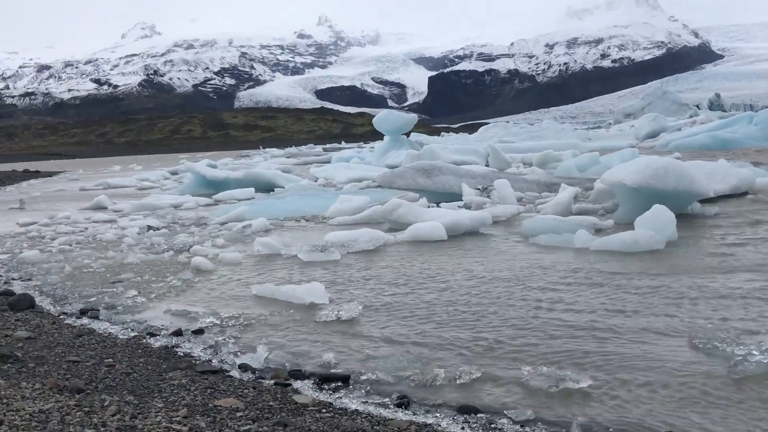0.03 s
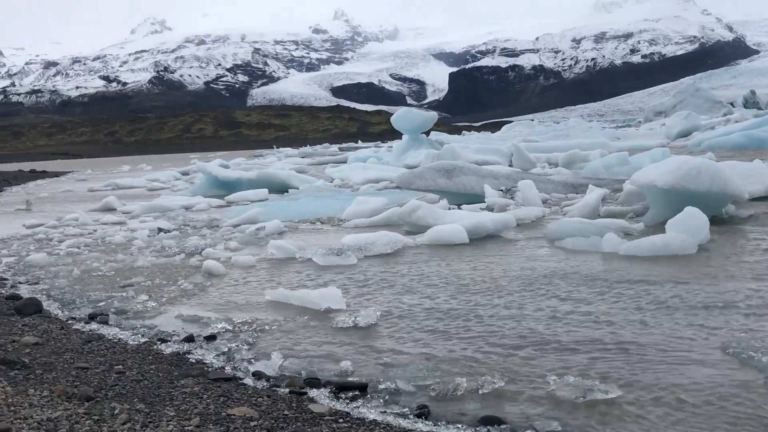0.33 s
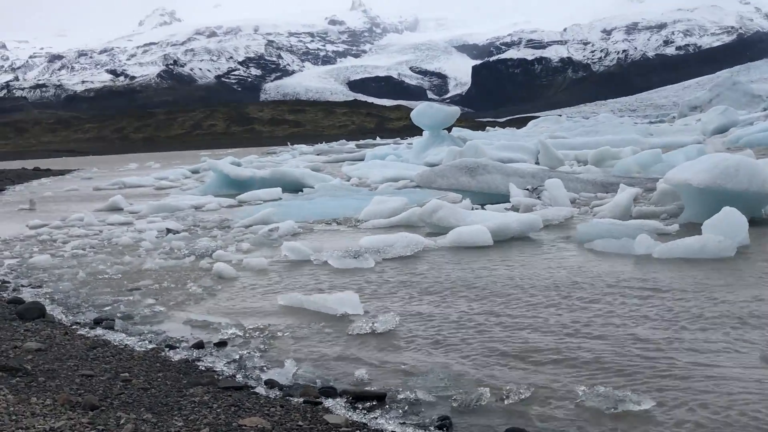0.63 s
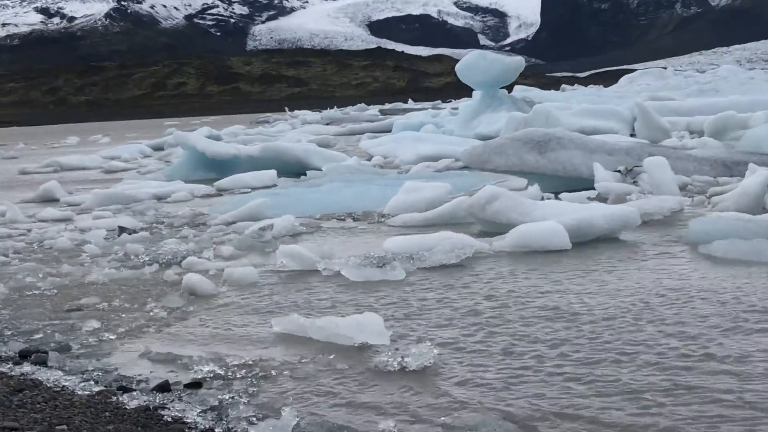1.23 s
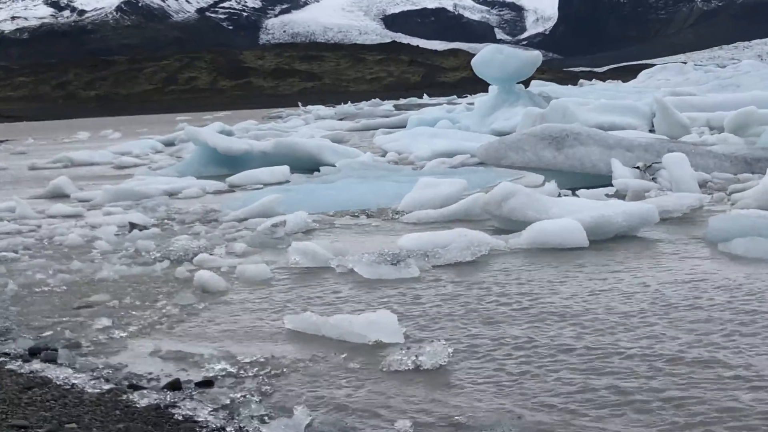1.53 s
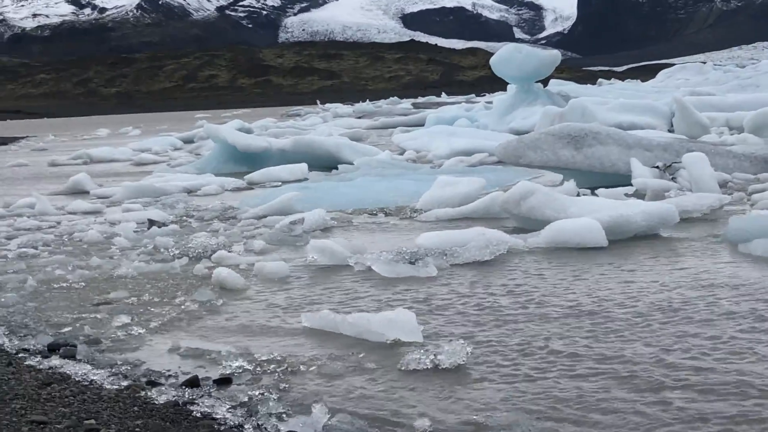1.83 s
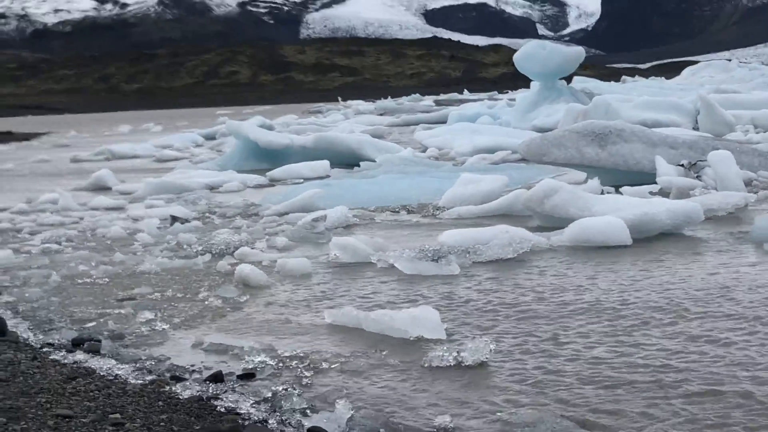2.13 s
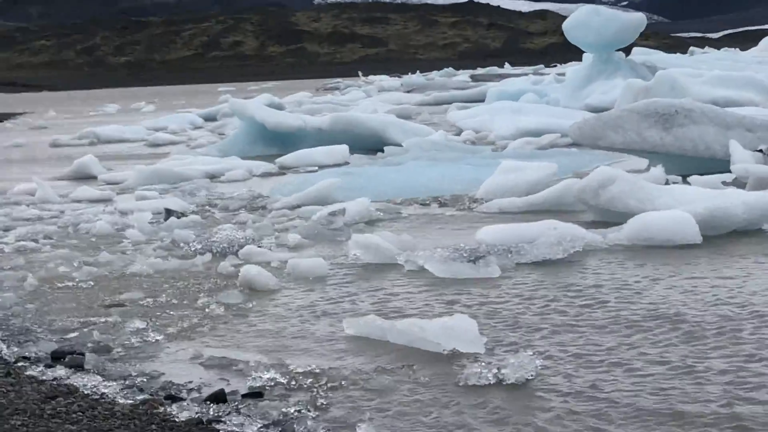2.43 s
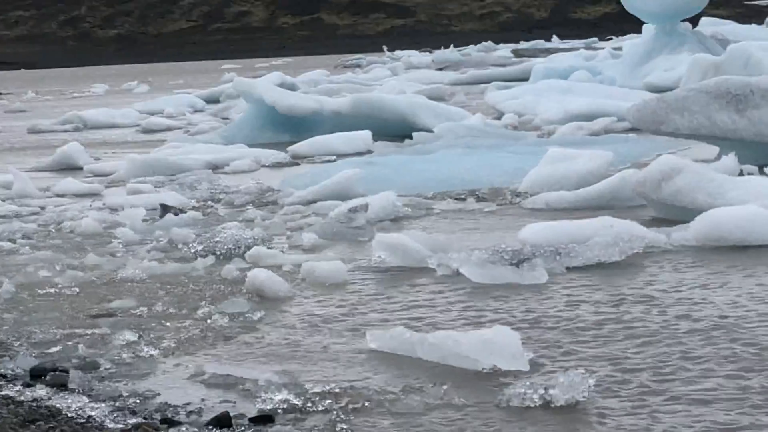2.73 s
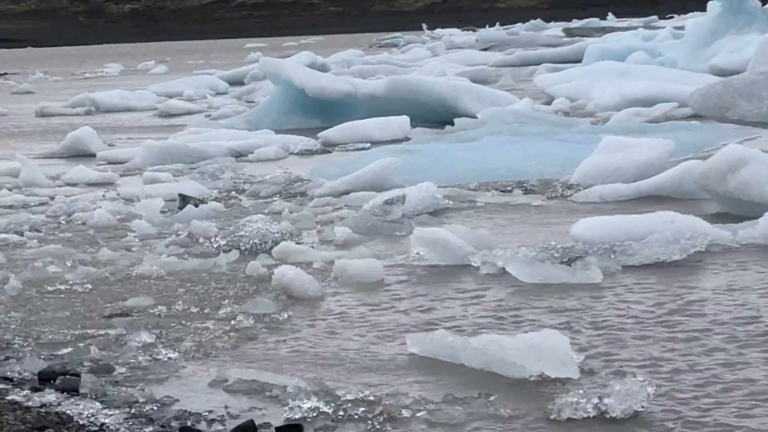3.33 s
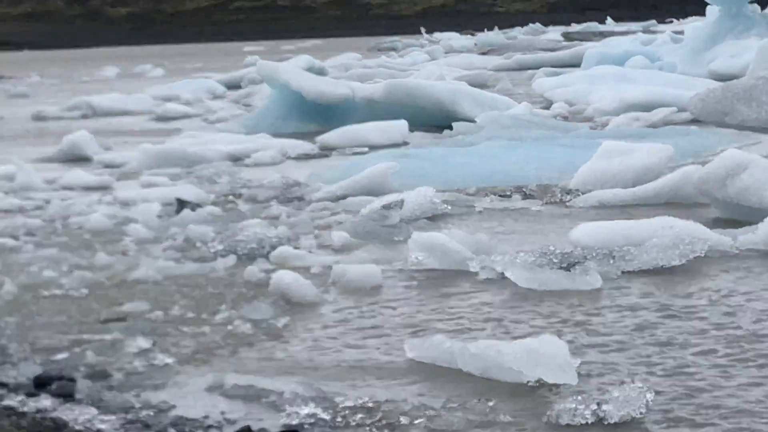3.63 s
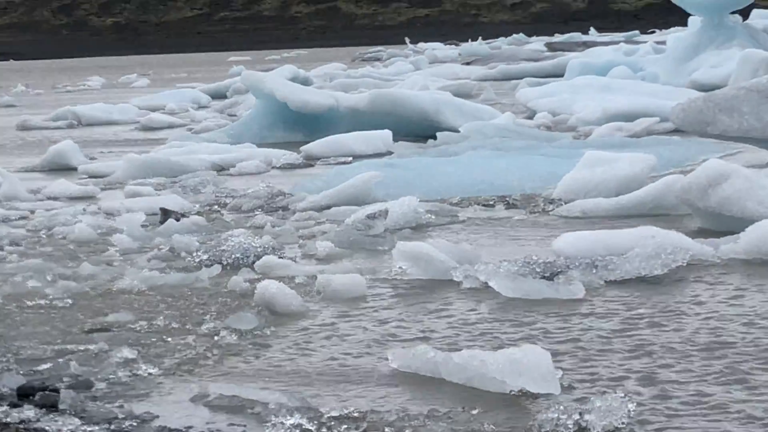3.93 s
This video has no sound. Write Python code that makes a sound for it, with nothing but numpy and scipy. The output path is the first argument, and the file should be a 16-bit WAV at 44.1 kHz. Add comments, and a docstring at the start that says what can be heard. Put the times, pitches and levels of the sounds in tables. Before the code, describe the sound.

Gusty wind buffets the microphone from the start, in short, rough bursts over a low rumble. A hard gust lands at about 1 second, and another sharp blow near 1.8. The bursts ease briefly after 2 seconds, when a few wavelets fizz very faintly on the gravel shore. Deep thumps then come louder and more often, with more buffeting until 4 seconds. Rippling lagoon water hisses softly behind throughout.

```python
"""Gusty wind on a bare microphone, standing on the shore of an icy lagoon.
From the start, eddies break on the port in short, rough bursts that brighten as they grow stronger,
over a low rumble that swells slightly with the gusts. A hard gust lands near one second. Around two,
a few wavelets fizz faintly on the gravel, and from there deep thumps come louder and more often.
Rippling water hisses behind throughout; the recorder's limiter holds down the hardest blows."""
import sys
import numpy as np
from scipy import signal
from scipy.fft import rfft, irfft, next_fast_len
from scipy.io import wavfile
from scipy.ndimage import uniform_filter1d, minimum_filter1d, map_coordinates

SR = 44100
rng = np.random.default_rng(int(sys.argv[2]) if len(sys.argv) > 2 else 0)


def generate_wav(sig):
    """Save sig (samples, or channels by samples) to the path in sys.argv[1] as 16-bit PCM at SR."""
    pcm = np.round(np.clip(np.atleast_2d(sig).T, -1, 1) * 32767).astype(np.int16)
    wavfile.write(sys.argv[1], SR, pcm)


N = 176400

# air flow between the eddies: time_s, force_db
AIR_FLOW = [(0, -27), (.25, -23.5), (.4, -54), (.49, -50), (.55, -29), (.7, -52), (.8, -33.5), (1.0, -21.5),
            (1.3, -51.5), (1.66, -34.5), (1.76, -31.5), (2.0, -33.5), (2.25, -33), (2.43, -41.5),
            (2.7, -41), (2.85, -39), (3.0, -34.5), (3.25, -30), (3.4, -34.5), (3.5, -30.5), (3.77, -37.5),
            (4.0, -30.5)]
# eddies that hit the microphone port: centre_s, length_s, force_db
PORT_EDDIES = [(0.005, 0.042, -10.5), (0.03, 0.015, -32), (0.036, 0.028, -14.5), (0.085, 0.0049, -7),
               (0.158, 0.025, -20.5), (0.204, 0.017, -10.5), (.236, 0.012, -11), (0.288, 0.015, -9),
               (0.299, 0.039, -12.5), (0.342, 0.011, -12.5), (.364, 0.017, -12), (0.389, 0.0078, -13),
               (0.43, 0.017, -17.5), (0.454, .006, -27), (.583, 0.01, -16), (0.63, 0.0077, -15),
               (0.674, 0.01, -13.5), (0.732, 0.012, -15.5), (0.759, 0.021, -17.5), (0.787, 0.033, -24),
               (.833, 0.0099, -9), (0.937, 0.016, -5), (0.963, 0.029, -9), (1.002, 0.021, -9),
               (1.036, 0.017, -14), (1.071, 0.027, -15), (1.114, 0.0053, -14.5), (1.152, 0.013, -17),
               (1.167, 0.0053, -9), (1.206, 0.059, -13.5), (1.25, 0.032, -20.5), (1.282, 0.016, -19),
               (1.333, .007, -15), (1.35, 0.043, -23), (1.38, 0.009, -16), (1.411, 0.0068, -13),
               (1.476, 0.019, -21.5), (1.539, 0.013, -26), (1.564, 0.0059, -6.5), (1.619, 0.015, -16),
               (1.716, 0.022, -18), (1.788, 0.0086, -21), (1.814, 0.013, -14), (1.835, 0.01, -6.5),
               (1.845, 0.011, -4), (1.9, 0.0071, -22.5), (2.014, 0.0069, -17), (2.046, 0.013, -18),
               (2.075, 0.016, -14), (2.33, 0.089, -26), (2.479, 0.0077, -18.5), (2.535, 0.044, -26),
               (2.577, 0.012, -12.5), (2.608, 0.027, -23), (2.67, .008, -17), (2.682, 0.0059, -11.5),
               (2.697, 0.022, -17.5), (2.741, 0.0052, -4), (2.775, 0.022, -9), (2.889, .014, -17),
               (2.949, 0.037, -22), (2.992, 0.028, -13.5), (3.067, 0.017, -13), (3.101, 0.017, -23.5),
               (3.161, 0.0066, -15.5), (3.184, 0.015, -11.5), (3.2, .04, -24.5), (3.289, 0.0049, -14),
               (3.329, 0.0081, -10.5), (3.355, 0.016, -14), (3.369, 0.0073, -5), (3.433, 0.023, -17),
               (3.472, 0.0042, -12), (3.51, 0.0076, -18.5), (3.543, 0.01, -28), (3.598, 0.0083, -15),
               (3.625, 0.0058, -27), (3.666, 0.019, -21), (3.707, .011, -14), (3.727, 0.0069, -13),
               (3.817, 0.046, -26.5), (3.891, 0.0094, -14), (3.915, 0.0036, -10), (3.941, 0.012, -10)]
# spectrum of the buffeting at the reference force: frequency_hz, density_db
BUFFET_SPECTRUM = [(30, -23.5), (70, -4.5), (130, 0.5), (220, -2), (350, -4), (600, -9), (1000, -18.5),
                   (1500, -29.5), (2100, -43.5), (3200, -60.5), (5000, -71), (9000, -79.5), (16000, -100)]
# level gained per decibel of force, so stronger flow is brighter: frequency_hz, growth_db_per_db
BUFFET_GROWTH = [(100, 0.88), (220, 0.82), (500, 0.7), (1000, 1.26), (2000, 1.46), (4000, 2.12),
                 (8000, 1.03)]
# spectrum of the large, slow swirls: frequency_hz, density_db
RUMBLE_SPECTRUM = [(12, -44.5), (25, -22.5), (32, -32.5), (42, -10), (55, -7), (80, 0), (120, -8.5),
                   (180, -8), (300, -25), (700, -57), (2000, -100)]
# pressure thumps of passing vortices: centre_s, level_db, pitch_hz
VORTEX_THUMPS = [(0.206, -19, 151), (0.914, -12, 124), (1.574, -10, 122), (1.855, -13, 111),
                 (2.19, -7.5, 82), (2.59, -6, 147), (2.671, -6.5, 202), (2.707, -9, 99), (2.801, -10.5, 95),
                 (3.191, -9, 105), (3.339, -4, 97.5), (3.895, -12, 124)]
# steep gust fronts that slap the port: centre_s, level_db
GUST_FRONTS = [(.085, -38.5), (.202, -35), (0.235, -39), (0.312, -32), (0.343, -35), (.678, -47.5),
               (0.747, -39), (.936, -33), (.959, -28.5), (0.999, -34), (1.564, -31), (1.845, -27),
               (2.582, -39.5), (2.683, -29.5), (2.741, -36.5), (3.068, -37), (3.181, -36), (3.326, -27),
               (3.371, -32), (3.936, -40)]
# spectrum of their cracks: frequency_hz, density_db
CRACK_SPECTRUM = [(500, -22.5), (1200, -1.5), (2200, 0.5), (3500, -6.5), (5000, -21), (7000, -30),
                  (10000, -42), (16000, -57.5)]
# spectrum of the rippling water: frequency_hz, density_db
RIPPLE_SPECTRUM = [(100, -2), (700, 1), (1500, -2.5), (2500, -9), (4000, -12.5), (5500, -16.5),
                   (6600, -15.5), (7500, -20), (9000, -22.5), (10700, -23), (12500, -28), (15800, -32.5)]
# swell of the ripples: time_s, gain_db
RIPPLE_SWELL = [(0, 2), (.3, 0.5), (.5, -1.5), (.9, 0.5), (1.2, -3), (1.6, 0.5), (1.9, 1.5), (2.2, 1),
                (2.31, -3.5), (2.48, 1), (2.75, -0.5), (3.3, .5), (3.8, -0.5), (4, 0)]
# wavelets running up the gravel: centre_s, length_s, level_db
SHORE_WAVELETS = [(1.902, .3, -72), (2.16, .07, -64), (2.24, .05, -66), (2.49, .15, -67.5)]
# spectrum of their fizz: frequency_hz, density_db
FIZZ_SPECTRUM = [(1000, -20), (3000, -3.5), (5600, -4), (6700, 1), (7800, -8), (9600, -7), (10400, 1),
                 (11200, -0.5), (12200, -11), (15800, -15)]


def buffeting(force_db, flutter_db=2.5, crackle_db=6.5, strong_db=12, linger_cycles=0.38, level_db=-21):
    """Turbulence right at the port: each octave grows with the force at its own rate; low ones linger."""
    unrest = 1 - 0.55 * np.clip(force_db / strong_db, 0, 1)  # a strong eddy flutters less than light air
    whirls_db = flutter_db * wobble(100) + crackle_db * wobble(330)  # small whirls and the finest ones
    push_db = force_db + unrest * whirls_db
    air, out = noise(BUFFET_SPECTRUM), np.zeros(N)
    centres_hz = np.geomspace(100, 12800, 8)
    for hz, weights in zip(centres_hz, np.eye(len(centres_hz))):
        octave = filtered(air, lambda f: along(np.column_stack([centres_hz, weights]), f))
        push = amp(along(BUFFET_GROWTH, hz) * push_db)
        decay = np.exp(-hz / (linger_cycles * SR))  # a whirl outlasts its push by part of a cycle
        out += octave * signal.lfilter([1 - decay], [1, -decay], push)
    return amp(level_db) * out


def wind_force(reference_db=-21.5):
    """Force on the port in dB over the reference: the flow plus a bell-shaped swell for each eddy."""
    t = np.arange(N) / SR
    power = amp(curve(AIR_FLOW)) ** 2
    for centre_s, length_s, force_db in PORT_EDDIES:
        near = np.abs(t - centre_s) < 2 * length_s
        power[near] += amp(force_db) ** 2 * np.exp(-(2 * (t[near] - centre_s) / length_s) ** 2)
    return 10 * np.log10(power) - reference_db


def rumble(force_db, level_db=-20.5, growth=0.13, swing_db=1.0):
    """Large swirls keep the diaphragm heaving even between eddies."""
    return noise(RUMBLE_SPECTRUM) * amp(level_db + growth * force_db + swing_db * wobble(14))


def thumps(half_width_cycles=0.96):
    """A vortex passing the microphone swings the pressure for two or three slow cycles."""
    t, out = np.arange(N) / SR, np.zeros(N)
    for centre_s, level_db, pitch_hz in VORTEX_THUMPS:
        cycles = (t - centre_s) * pitch_hz
        envelope = amp(level_db) * np.exp(-(cycles / half_width_cycles) ** 2)
        out += envelope * np.sin(2 * np.pi * (cycles + rng.random()))
    return out


def cracks(half_width_s=0.0015):
    """A few milliseconds of bright, tearing air as each steep front slaps the port."""
    t = np.arange(N) / SR
    slaps = sum(amp(level_db) * np.exp(-((t - centre_s) / half_width_s) ** 2)
                for centre_s, level_db in GUST_FRONTS)
    return noise(CRACK_SPECTRUM) * slaps


def water(ripple_db=-52, swing_db=0.84):
    """Behind the wind, ripples wash faintly among the ice and a few wavelets fizz on the shore."""
    t = np.arange(N) / SR
    ripples = noise(RIPPLE_SPECTRUM) * amp(ripple_db + curve(RIPPLE_SWELL) + swing_db * wobble(35))
    lapping = sum(amp(level_db) * np.exp(-2 * ((t - centre_s) / length_s) ** 2)
                  for centre_s, length_s, level_db in SHORE_WAVELETS)
    return ripples + noise(FIZZ_SPECTRUM) * lapping


def amp(db):
    """Decibels to gain."""
    return 10 ** (np.asarray(db) / 20)


def along(points, hz):
    """Rows of frequency_hz, value, read at hz on a log axis."""
    frequencies_hz, values = np.transpose(points)
    return np.interp(np.log(hz + 1), np.log(frequencies_hz + 1), values)


def curve(rows):
    """Rows of time_s, value, as one value per sample."""
    return np.interp(np.arange(N) / SR, *np.transpose(rows))


def wobble(knots_per_s):
    """A smooth random curve."""
    return map_coordinates(rng.standard_normal(N // 16), [np.arange(N) * knots_per_s / SR], mode="wrap")


def filtered(x, response):
    """x through a filter whose gain is response(hz)."""
    size = next_fast_len(N + SR // 4)
    return irfft(rfft(x, size) * response(np.fft.rfftfreq(size, 1 / SR)), size)[..., :N]


def noise(spectrum):
    """Coloured noise of rms 1."""
    coloured = filtered(rng.standard_normal(N), lambda hz: amp(along(spectrum, hz)))
    return coloured / np.sqrt(np.mean(coloured ** 2) + 1e-20)


def scene():
    """One bare microphone on the shore: wind right on it, water behind."""
    force_db = wind_force()
    return (buffeting(force_db) + rumble(force_db) + thumps() + water() + cracks())[None]


def record(dry, low_cut_hz=37, ceiling=0.65, look_ahead_s=0.0015, fade_s=0.005, top_hz=15800):
    """The recorder: a low cut, a fast limiter, soft ends and a band limit."""
    low_cut = signal.sosfilt(signal.butter(4, low_cut_hz, "high", fs=SR, output="sos"), dry)
    window = int(look_ahead_s * SR)
    needed_gain = np.minimum(1, ceiling / (np.abs(low_cut) + 1e-9))
    held_gain = minimum_filter1d(needed_gain, 2 * window)
    smooth_gain = uniform_filter1d(uniform_filter1d(held_gain, window), window)
    fade = np.sin(np.pi / 2 * np.minimum(1, np.arange(N) / SR / fade_s)) ** 2
    return filtered(low_cut * smooth_gain * fade * fade[::-1], lambda hz: hz < top_hz)


dry = scene()
out = record(dry)
generate_wav(out)
```